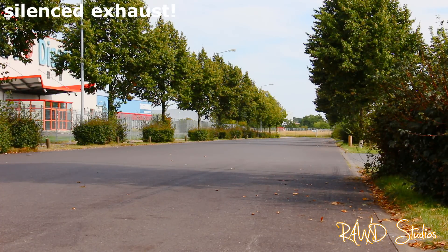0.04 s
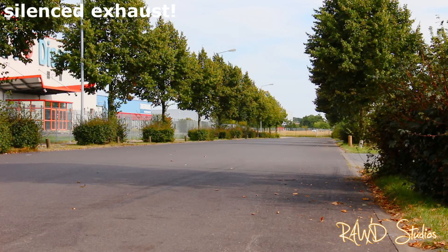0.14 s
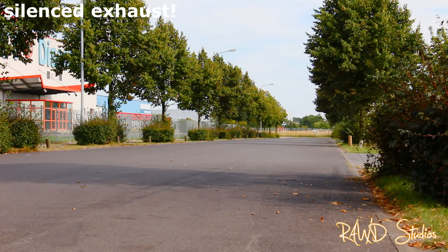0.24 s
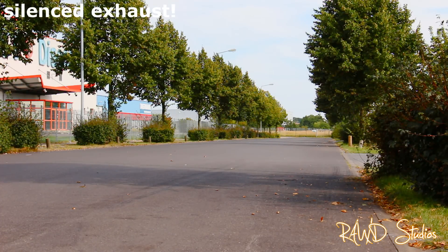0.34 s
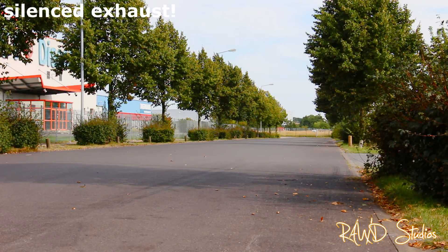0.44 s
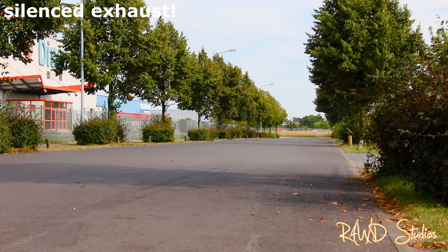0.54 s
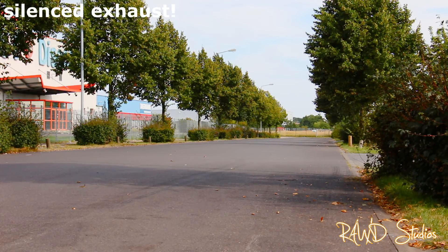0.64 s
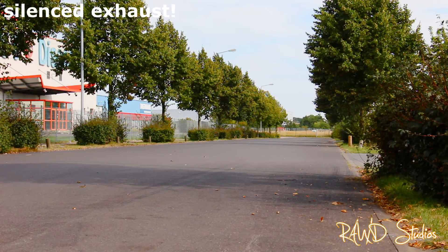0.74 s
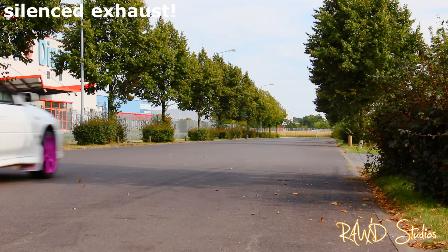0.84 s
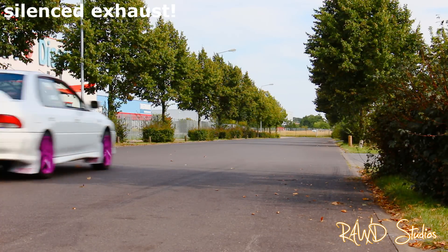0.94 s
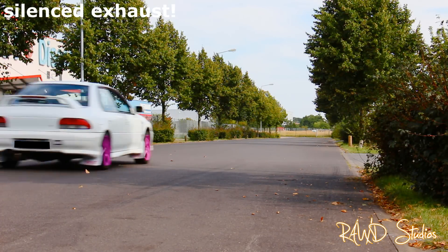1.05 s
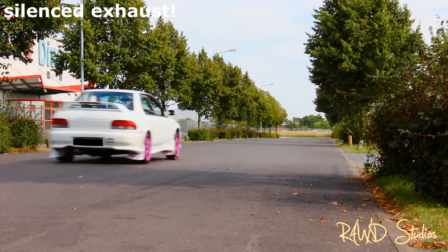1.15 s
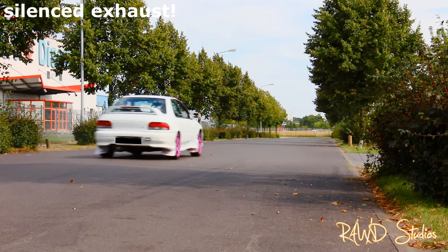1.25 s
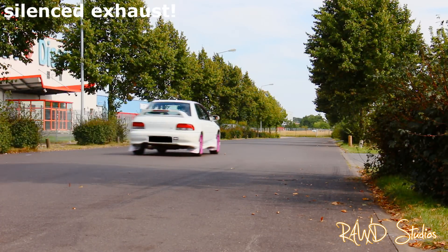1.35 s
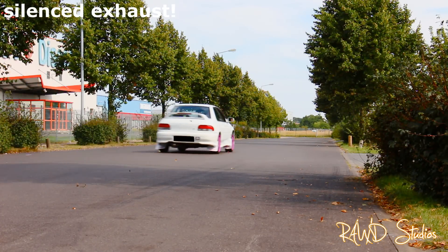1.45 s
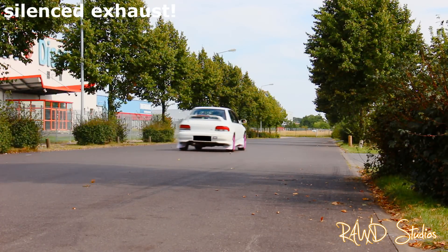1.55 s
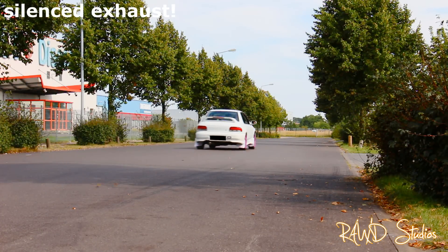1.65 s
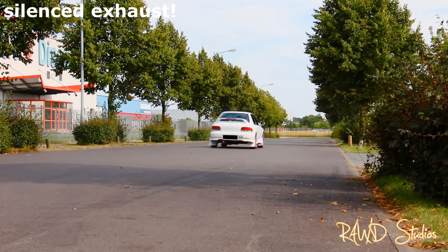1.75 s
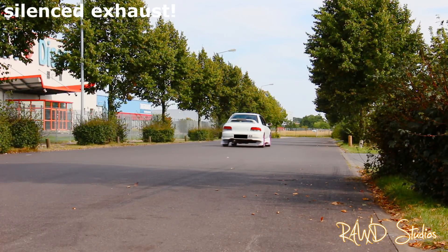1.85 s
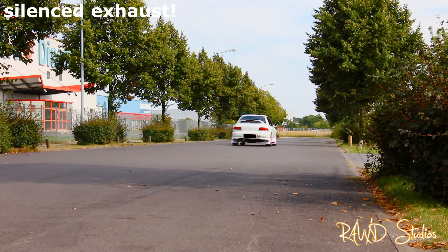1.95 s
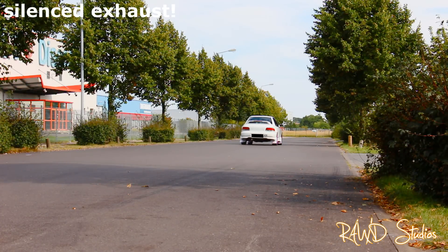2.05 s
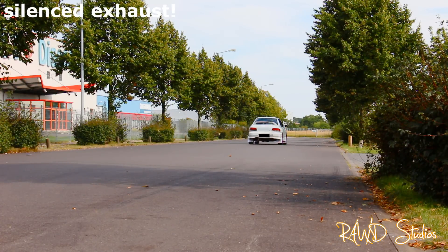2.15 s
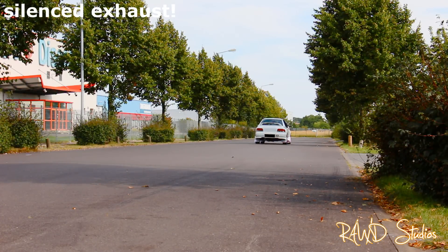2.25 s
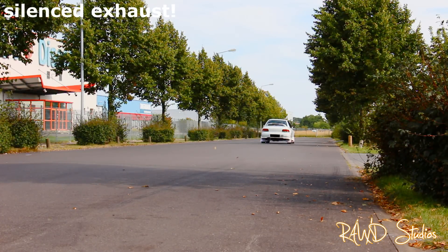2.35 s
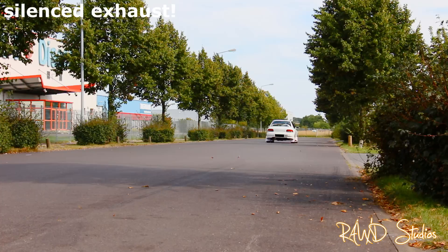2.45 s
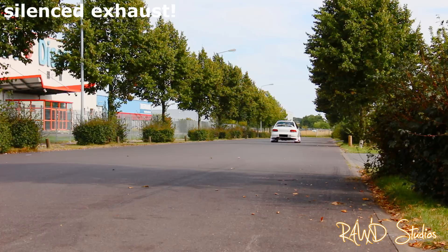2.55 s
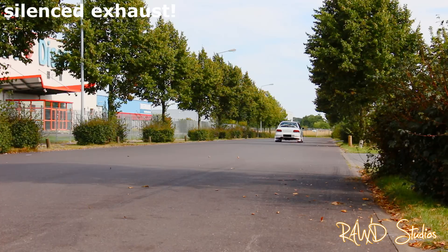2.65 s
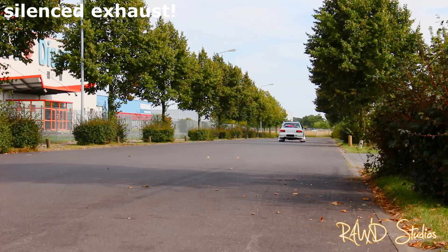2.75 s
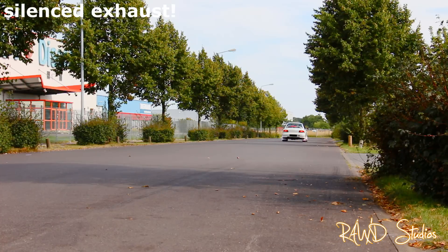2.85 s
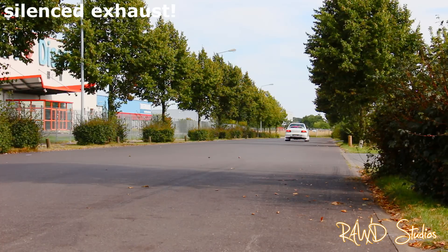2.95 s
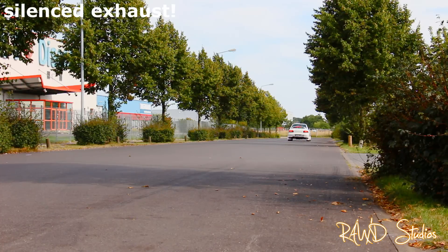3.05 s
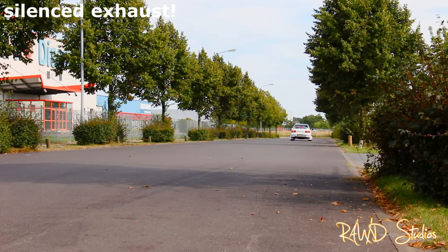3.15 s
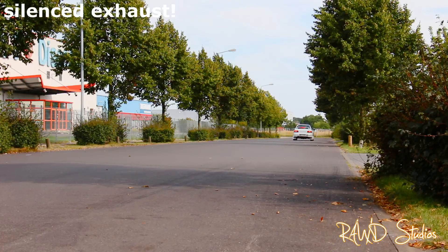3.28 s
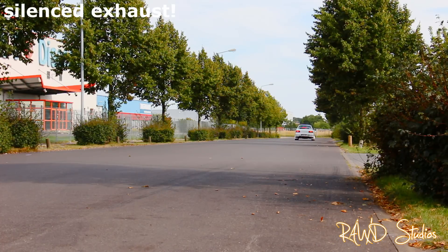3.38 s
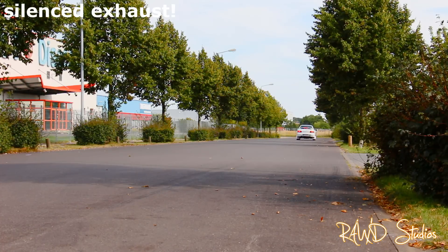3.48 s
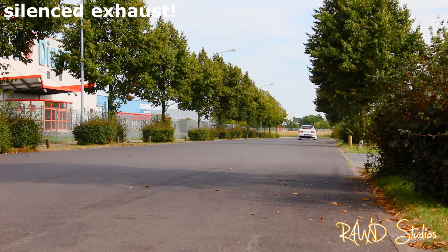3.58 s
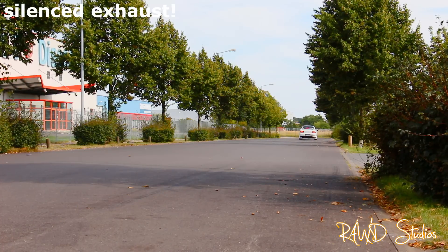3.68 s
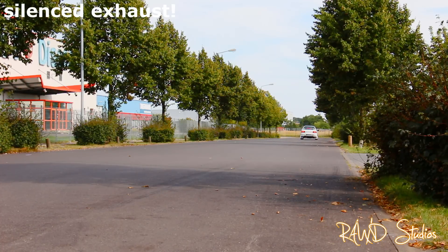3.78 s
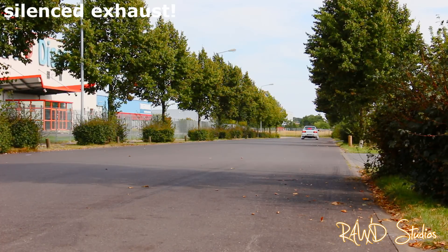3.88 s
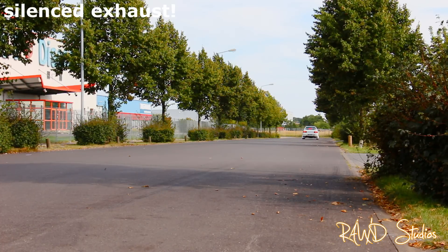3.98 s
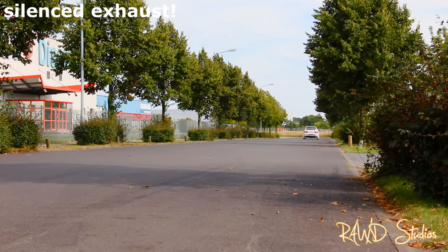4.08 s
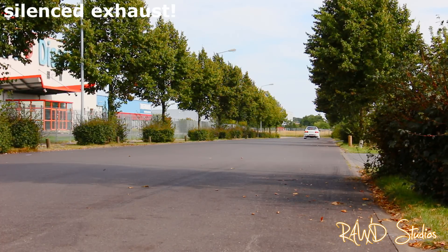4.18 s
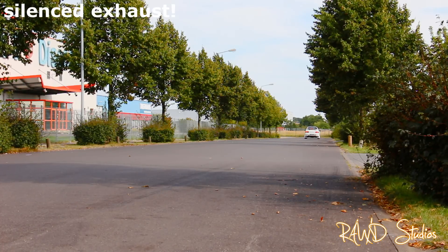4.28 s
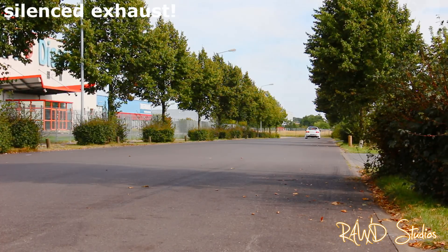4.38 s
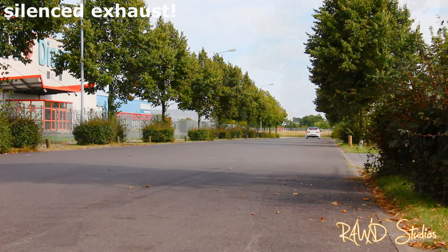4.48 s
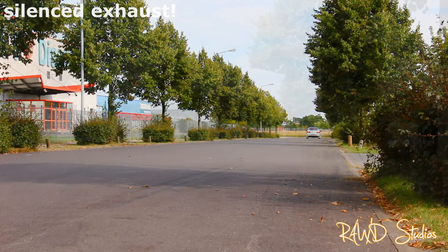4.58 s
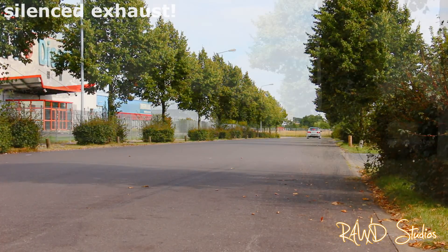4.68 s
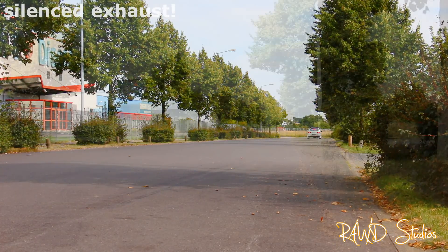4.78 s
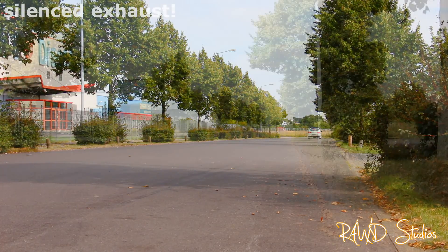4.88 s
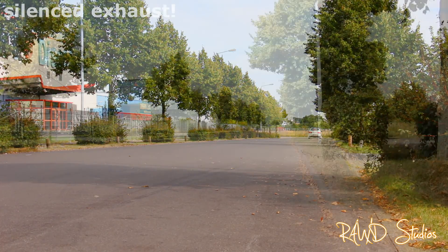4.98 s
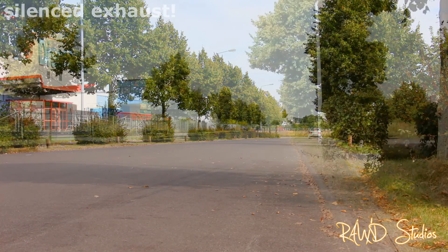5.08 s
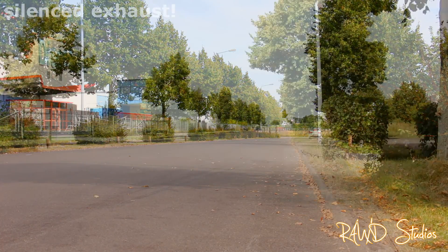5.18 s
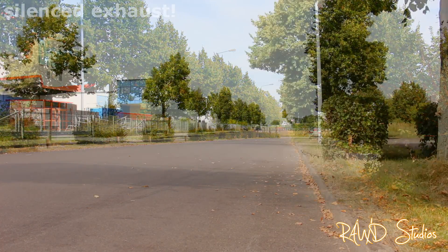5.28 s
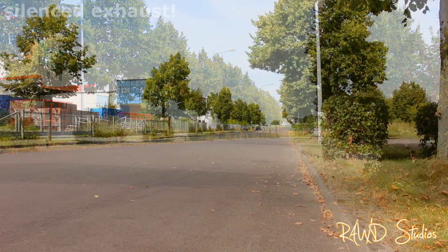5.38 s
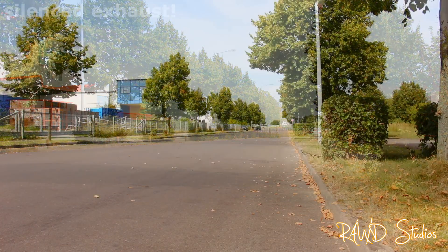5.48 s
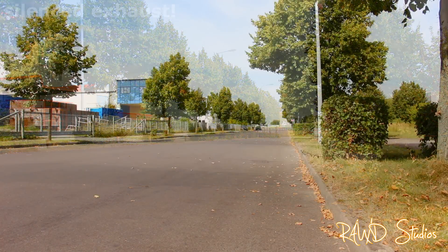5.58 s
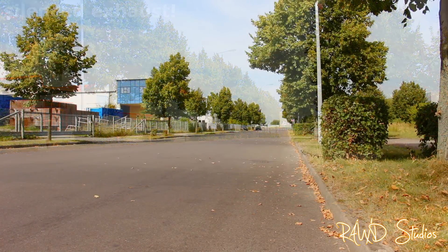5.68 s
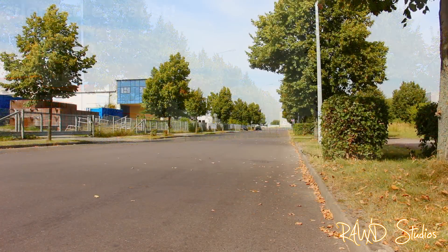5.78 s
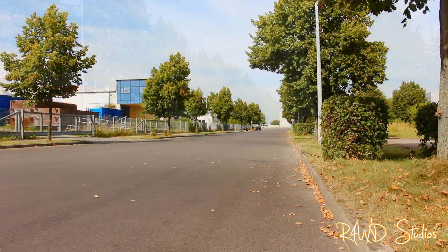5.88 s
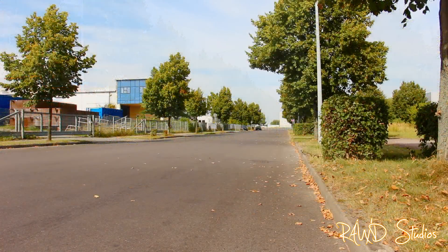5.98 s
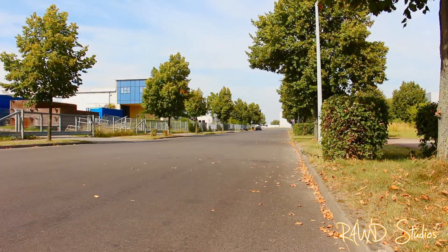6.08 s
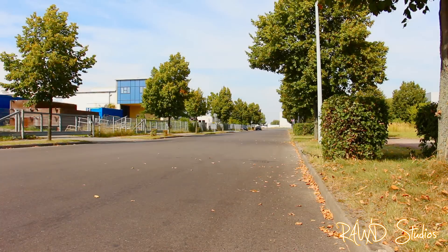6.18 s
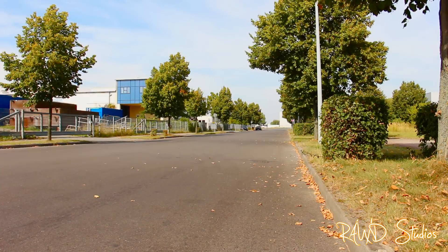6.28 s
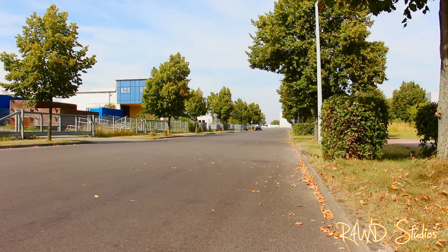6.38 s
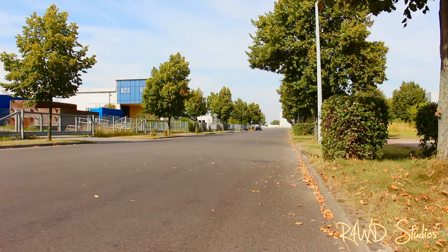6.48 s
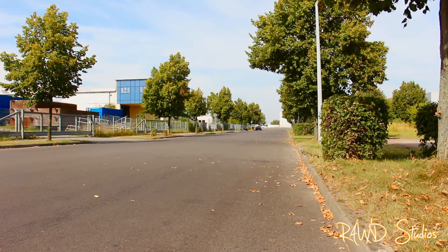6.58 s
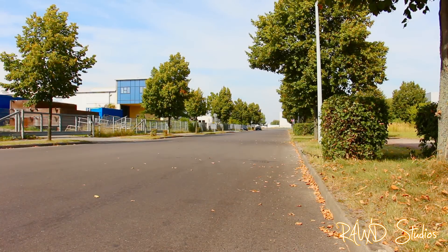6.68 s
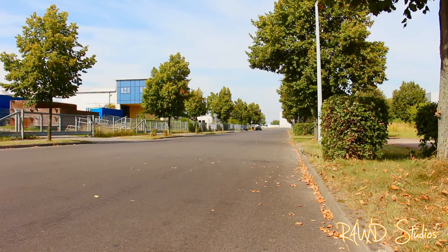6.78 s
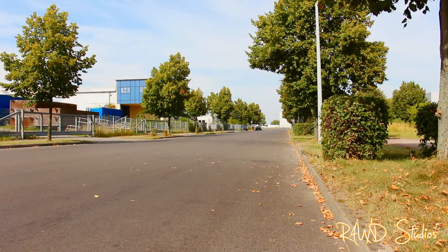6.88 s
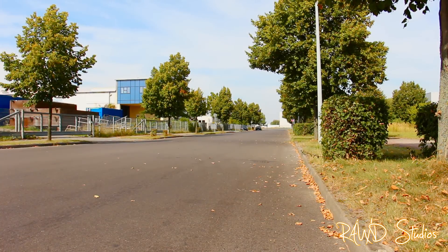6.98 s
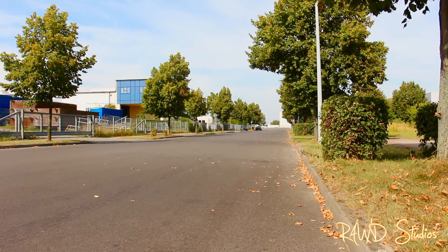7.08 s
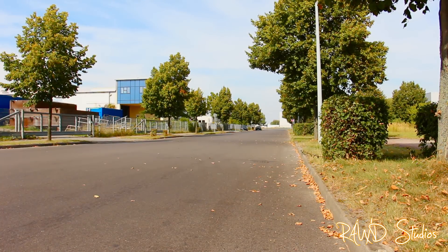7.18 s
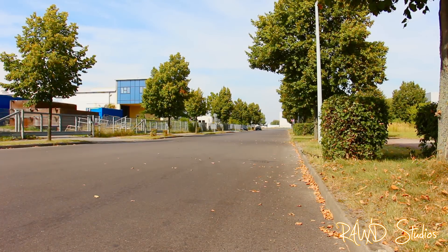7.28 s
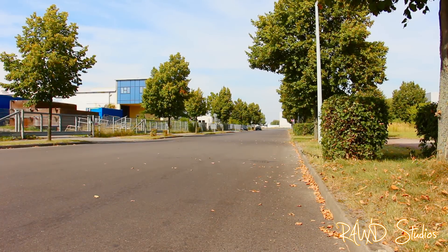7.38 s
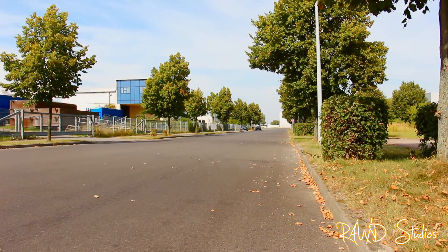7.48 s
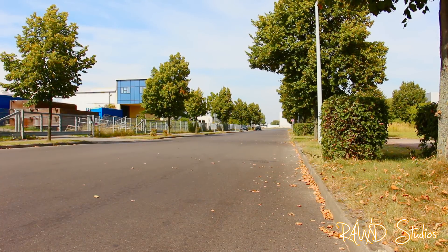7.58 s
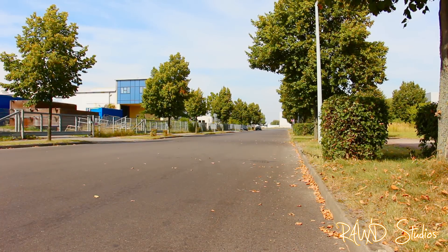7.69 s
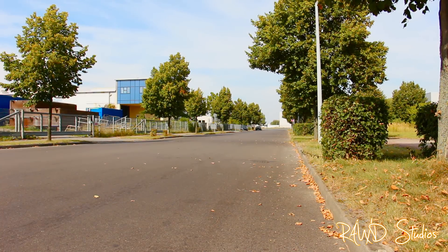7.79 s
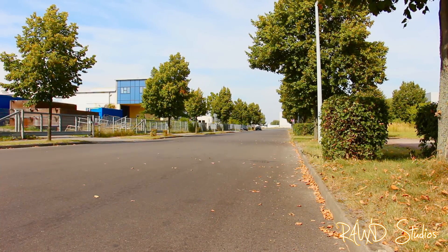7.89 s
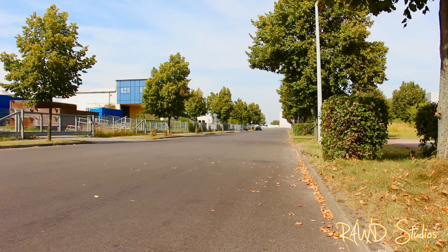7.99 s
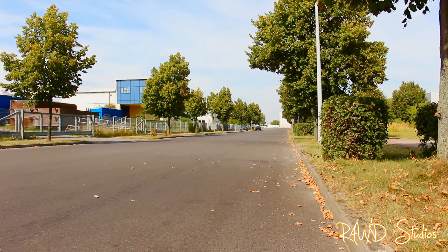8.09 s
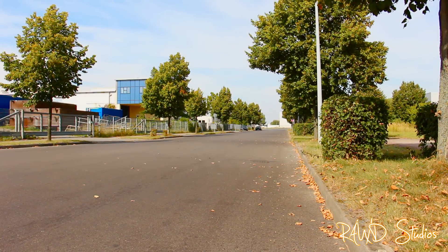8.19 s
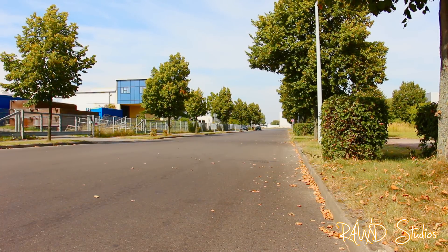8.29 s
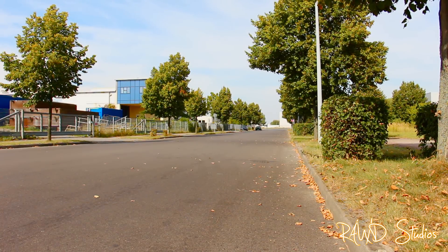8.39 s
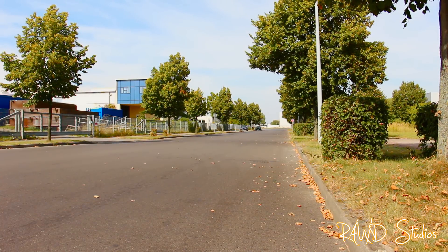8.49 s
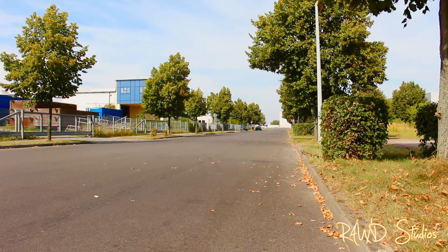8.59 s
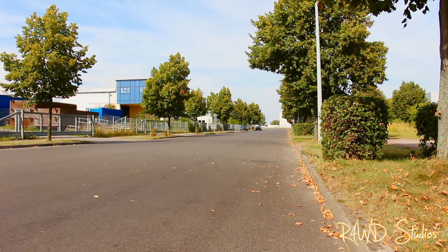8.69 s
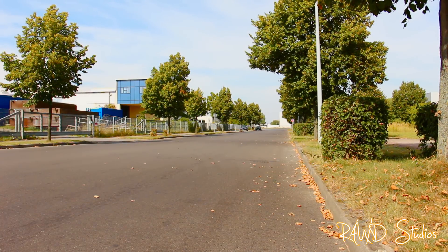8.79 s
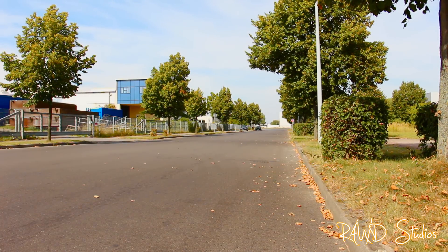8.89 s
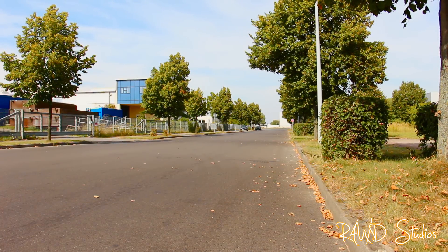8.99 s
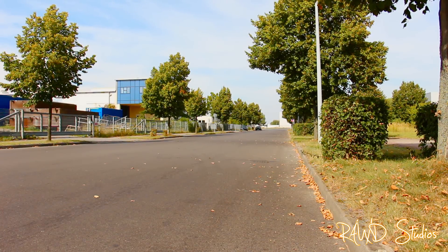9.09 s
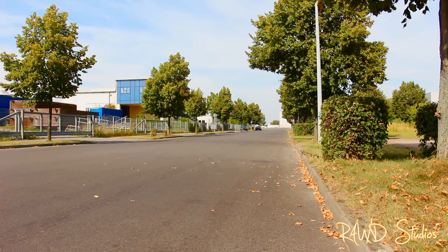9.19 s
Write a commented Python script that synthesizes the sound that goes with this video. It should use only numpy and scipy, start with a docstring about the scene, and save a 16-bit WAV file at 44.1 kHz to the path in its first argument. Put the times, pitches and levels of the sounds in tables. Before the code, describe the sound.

A loud full-throttle car pass, exhaust crackling as it coasts off, followed by a quieter approaching acceleration with one upshift.

```python
"""First you hear a car roar past at full throttle, so close that it overloads the microphone.
The driver lifts off, and the exhaust of its turbocharged flat-four engine crackles and burbles away.
A second, approaching pull fades in over it, with a thin turbo whistle, a gear change, a few puffs
and a lower, Doppler-shifted reflection. Tyres roar, intake air rushes and dry leaves tick.
The engine note is a stack of tones called orders: order k swings k times in each four-stroke cycle."""
import sys
import numpy as np
from scipy import signal
from scipy.fft import rfft, irfft, next_fast_len
from scipy.io import wavfile

SR = 44100
rng = np.random.default_rng(int(sys.argv[2]) if len(sys.argv) > 2 else 0)


def store_pcm(level_fs):
    """Save levels as 16-bit WAV."""
    pcm = np.round(np.clip(level_fs, -1, 1) * 32767).astype(np.int16)
    wavfile.write(sys.argv[1], SR, np.atleast_2d(pcm).T)


N = 407484
T = np.arange(N) / SR
LIFT_S, SHIFT_S, SHIFT_END_S = 1.902, 7.62, 8.3  # the driver lifts off; the gear change starts, ends


def from_db(db):
    """Turn decibels into a gain."""
    return 10 ** (np.asarray(db) / 20)


def rms_one(x):
    """Scale a signal to an average power of 1."""
    return x / np.sqrt(np.mean(x ** 2) + 1e-20)


def in_time(rows, t=T):
    """Read a table's columns at times t, gliding between rows."""
    seconds, *columns = np.transpose(rows)
    return [np.interp(t, seconds, column) for column in columns]


def at_hz(colour, hz):
    """Gain of a colour (a table of Hz and dB) at a frequency; almost nothing beyond its ends."""
    freqs, db = np.transpose(colour)
    return from_db(np.interp(np.log(hz + 1e-6), np.log(freqs), db, left=-90, right=-90))


def after(start, fade):
    """Fade in around start and stay on."""
    return np.clip((T - start) / fade + .5, 0, 1)


def window(start, end, fade_in, fade_out):
    """Fade in around start and out around end."""
    return after(start, fade_in) * np.clip((end - T) / fade_out + .5, 0, 1)


def bell(x, centre, width):
    """A smooth bump of height 1."""
    return np.exp(-.5 * ((x - centre) / width) ** 2)


def drift(rate_hz, t=T):
    """A smooth random wobble, about 1 in size."""
    pole = np.exp(-80 * np.pi * rate_hz / SR)
    slow = signal.lfilter([1], [1, -2 * pole, pole * pole], rng.standard_normal(N // 40 + 2002))[2000:]
    return np.interp(t * SR / 40, np.arange(len(slow)), rms_one(slow))


def noise(colour):
    """Steady noise of the given colour, with power 1."""
    size = next_fast_len(N)
    spectrum = rfft(rng.standard_normal(size)) * at_hz(colour, np.fft.rfftfreq(size, 1 / SR))
    return rms_one(irfft(spectrum, size)[:N])


def swells(rows, colour):
    """Noise that rises to each peak and falls away just as fast."""
    return noise(colour) * sum(from_db(db) * np.exp(-np.abs(T - s) / fade) for s, db, fade in rows)


def crank(cycle_hz, t):
    """How far the engine's cycle has turned, in radians; its speed is a little unsteady."""
    return 2 * np.pi * np.cumsum(cycle_hz * (1 + .003 * drift(25.7, t))) / SR


# The four cylinders fire unevenly. Each row: place in the cycle from 0 to 1, strength.
FIRINGS = [(0, 0.87), (0.228, 0.396), (.5, 0.54), (0.787, 0.46)]

def order_tone(k, angle, t, flutter_db, scatter):
    """One order: the firings set its timing; street echoes scatter that (in radians) and add flutter."""
    place, strength = np.transpose(FIRINGS)
    lead = np.angle(np.sum(strength * np.exp(-2j * np.pi * k * place))) + scatter * drift(0.98, t)
    return np.sqrt(2) * np.cos(k * angle + lead) * from_db(flutter_db * drift(7.9, t))


def exhaust_behind(speed, gate, orders, pipe, *, boom_db, third_db, bark_db, count,
                   flutter_db, scatter, gas_db, throb, tilt_db=0, flare_db=0):
    """The exhaust from behind: a low boom, a bark coloured by the pipe, and throbbing gas noise."""
    on = gate > 0
    t, cycle_hz = T[on], speed[on]
    boom_db, third_db, bark_db, tilt_db, flare_db = (
        np.broadcast_to(db, N)[on] for db in (boom_db, third_db, bark_db, tilt_db, flare_db))
    angle = crank(cycle_hz, t)
    third = from_db(third_db)  # order 3 compared with order 4, the firing rate
    firing = 1 / np.hypot(1, third)
    boom, bark, bark_power = 0, 0, 1e-12
    for k in range(1, count + 1):
        tone = order_tone(k, angle, t, flutter_db, scatter)
        weight = from_db(np.interp(k, *np.transpose(orders)))
        if k < 7:
            boom += tone * firing * {3: third, 4: 1}.get(k, weight)
        else:
            flare = flare_db * bell(k * cycle_hz, centre=780, width=55)
            gain = weight * at_hz(pipe, k * cycle_hz) * from_db(tilt_db * np.log2(k) + flare)
            bark += gain * tone
            bark_power += gain ** 2
    gas = from_db(gas_db) * noise(pipe)[on] * rms_one(np.exp(throb * np.cos(angle)))
    out = np.zeros(N)
    out[on] = from_db(boom_db) * boom + from_db(bark_db) * (bark / np.sqrt(bark_power) + gas)
    return out * gate


# Colours of tyre roar, intake rush and hiss. Each row: frequency in Hz, level in dB.
NEAR_TYRES = [(60,-22),(130,-15),(250,-0.5),(600,4.5),(1100,1),(1500,-4),(2000,-12),(2600,-14),(4000,-42)]
FAR_TYRES = [(330,-23.5),(480,-4),(680,-10.5),(850,-4.5),(1250,0),(1550,-4),(1800,-10),(2100,-24.5),(3000,-27)]
RUSH = [(1200,-10),(2000,-0.5),(2500,-4),(3100,-3),(4000,-6),(5000,-12),(6300,-16.5),(8000,-23.5)]
NEAR_HISS = [(4500,-7),(6500,-4.5),(8000,-3.5),(11000,-5.5),(14000,-8),(16000,-13)]
FAR_HISS = [(4800,0),(6500,-1),(8500,-3),(10500,-9.5),(13000,-22),(16000,-26)]

def air(gains, colours, flicker_db):
    """Layers of noise, shaken together by swirling air."""
    layers = sum(gain * noise(colour) for gain, colour in zip(gains, colours))
    return layers * from_db(flicker_db * drift(28))


# Passing tyres, rush and hiss. Each row: peak time in seconds, level in dB,
# then the seconds before and after the peak at which the power is half.
PASSING_AIR = [(0.89,-14.5,0.28,0.49),(1,-23,0.41,0.37),(0.8,-25.5,0.73,0.19)]

def passing_air():
    """Tyre and air noise grow as the car nears and fade as it leaves; the hiss surges close by."""
    roar, rush, hiss = (from_db(db) / np.hypot(1, (T - s) / np.where(T < s, before, later))
                        for s, db, before, later in PASSING_AIR)
    surge = from_db(4.1 * bell(T, centre=0.63, width=0.09))
    return air([roar, rush, hiss * surge], (NEAR_TYRES, RUSH, NEAR_HISS), flicker_db=0.5)


# Engine speed as heard; the Doppler drop flattens its climb near one second.
# Each row: time in seconds, cycles per second.
PASS_SPEED = [(0,43.3),(.3,46.4),(.5,48.7),(.7,49.4),(.85,49.3),(1.05,50.2),(1.45,53.4),(1.82,56.2),(1.92,56.6)]
# Exhaust loudness. Each row: time in seconds, boom in dB, bark in dB, bark brightness in dB per octave.
PASS_LEVELS = [(0,-15.5,-23,0),(.3,-14.5,-17.5,-15),(.5,-19.5,-16,-1),(.58,-12,-14.5,0),(.63,-14.5,-12.5,0),(.69,-15.5,-3.5,2),(1.05,-8.5,-0.5,4),(1.16,-14.5,-1,1.5),(1.55,-19,-5,1),(1.88,-19.5,-8,-7.5)]
# Unequal exhaust pipes favour some orders. Each row: order, level in dB.
PASS_ORDERS = [(1,-30),(2,-25),(5,-6),(6,-20),(7,-15),(8,1.5),(9,2),(10,-13),(11,4),(12,1.5),(13,1),(14,-8),(15,-1),(16,-8),(17,0),(18,-4),(19,0),(20,-6),(21,0),(22,-6),(23,-1),(24,-3),(26,-1),(30,-6),(34,-3),(37,-2),(42,-5)]
# The pipe's colour at full throttle. Each row: frequency in Hz, level in dB.
PASS_PIPE = [(130,-24),(220,-17),(300,-10),(365,-5),(400,-6),(450,-2),(550,0),(620,0),(700,-3.5),(760,-6),(860,-9),(1050,-20),(1400,-23),(1950,-22),(2400,-36)]

def close_pass():
    """Full throttle beside the microphone, which overloads and squares off the wave."""
    gate = 1 - after(LIFT_S, fade=0.021)
    speed, = in_time(PASS_SPEED)
    boom_db, bark_db, tilt_db = in_time(PASS_LEVELS)
    flare_db = 11.5 * bell(T, centre=1.08, width=0.073)  # the tailpipe swings into view
    exhaust = exhaust_behind(
        speed, gate, PASS_ORDERS, PASS_PIPE, boom_db=boom_db, third_db=-9, bark_db=bark_db, count=42,
        flutter_db=1, scatter=.4, gas_db=-23, throb=0.28, tilt_db=tilt_db, flare_db=flare_db)
    ceiling = from_db(-6.5)
    drive = (exhaust + passing_air() * gate) / ceiling
    squared = ceiling * drive / (1 + drive ** 6) ** (1 / 6)
    # the input passes little of the deep tones that overload makes
    low_cut = signal.butter(2, 65, "high", fs=SR, output="sos")
    return signal.sosfiltfilt(low_cut, squared, padtype="even")


# The echo's colour. Each row: frequency in Hz, level in dB.
ECHO_COLOUR = [(90,-20),(170,1),(260,3.5),(350,2),(450,-12),(900,-16)]

def street_echo(sound, level_db=-32.5, decay_db_per_s=60):
    """Add the dull echo of buildings and trees."""
    tail = noise(ECHO_COLOUR)[:SR] * from_db(-decay_db_per_s * T[:SR])
    return sound + from_db(level_db) * signal.fftconvolve(sound, tail / np.linalg.norm(tail))[:N]


# The rumble's loudness. Each row: time in seconds, level in dB.
RUMBLE_LEVELS = [(0,-30),(2.3,-41),(3.3,-36.5),(4.3,-29),(4.7,-17),(5.5,-27),(6.6,-31.5),(7.4,-26.5),(8.3,-26.5),(9.24,-43)]
# Its colour. Each row: frequency in Hz, level in dB.
RUMBLE_COLOUR = [(12,-11),(25,-14.5),(45,-6.5),(80,-7.5),(165,-4.5),(205,-24.5),(270,-42),(450,-23.5),(700,-27.5)]

def rumble():
    """A low noise that swells and sinks under everything."""
    return from_db(in_time(RUMBLE_LEVELS)[0]) * noise(RUMBLE_COLOUR)


# The tailpipe's bark while coasting. Each row: time in seconds, level in dB.
COAST_BARK = [(1.91,-25),(1.98,-13),(2.09,-14),(2.17,-15.5),(2.195,-23),(2.26,-19),(2.31,-17.5),(2.44,-13.5),(2.79,-17.5),(3.61,-16.5),(3.87,-20.5),(4.67,-27.5),(4.9,-39)]
# The burble's mix of tones. Each row: order, level in dB.
COAST_ORDERS = [(1,-21),(2,-19),(5,-10),(6,-20),(7,9),(8,-5),(9,-5),(10,-6),(11,1),(12,2),(13,-5),(14,6),(15,2.5),(16,-4),(17,-7),(18,0),(19,3),(20,-7),(21,0),(22,-8),(23,2),(24,-6),(25,-9),(26,-2),(27,-11),(28,-5),(30,-11),(45,-10)]
# Where the silencer and the pipe ring. Each row: frequency in Hz, level in dB.
SILENCER = [(30,-32.5),(60,-26),(80,-24.5),(100,-16.5),(125,-30.5),(145,-35.5),(175,-30.5),(215,-47)]
COAST_PIPE = [(130,-19),(220,-29),(300,-23.5),(380,-19),(450,1),(520,-0.5),(620,3),(690,-13),(850,-13.5),(1100,-49),(1600,-31)]

def coasting():
    """Friction and drag slow the engine; its burble booms wherever it meets a silencer resonance."""
    start_hz, friction_hz_per_s, drag_per_s, end_s = 53.8, 4.27, .326, 4.9
    gate = window(LIFT_S, end_s, fade_in=.02, fade_out=0.22)
    elapsed = np.minimum(T, end_s) - LIFT_S
    friction_hz = friction_hz_per_s / drag_per_s
    speed = (start_hz + friction_hz) * np.exp(-drag_per_s * elapsed) - friction_hz
    third = from_db(-5) * at_hz(SILENCER, 3 * speed)
    firing = at_hz(SILENCER, 4 * speed)
    return exhaust_behind(
        speed, gate, COAST_ORDERS, COAST_PIPE, boom_db=20 * np.log10(np.hypot(third, firing)),
        third_db=20 * np.log10(third / firing), bark_db=in_time(COAST_BARK)[0], count=48,
        flutter_db=1.5, scatter=1.3, gas_db=-17, throb=0.41)


# Tyre roar while coasting. Each row: time in seconds, level in dB.
ROAR_LEVELS = [(1.949,-35),(2.4,-31.5),(2.701,-35.5),(3.15,-30.5),(3.55,-24.5),(4.9,-20),(5.5,-20.5),(6,-26.5),(6.4,-44)]
# Rush, then hiss. Each row: level in dB when the roar is at -24 dB, share of the roar's
# rise and fall that it follows, intake air in dB as the driver lifts off.
ROLLING_AIR = [(-43,0.19,-40.5),(-63.5,0.41,-49.5)]

def rolling():
    """Tyres roar as the car coasts; rush and hiss follow them once the intake air has died down."""
    roar_db, = in_time(ROAR_LEVELS)
    since_lift = np.maximum(T - LIFT_S, 0)
    rush, hiss = (np.hypot(from_db(db + share * (roar_db + 24)), from_db(intake_db - 20 * since_lift))
                  for db, share, intake_db in ROLLING_AIR)
    top_hiss = from_db(-50 - 81 * since_lift)  # the highest hiss dies fastest
    gate = window(LIFT_S, ROAR_LEVELS[-1][0], fade_in=0.029, fade_out=0.24)
    gains = [from_db(roar_db), rush, hiss, top_hiss]
    return air(gains, (FAR_TYRES, RUSH, FAR_HISS, NEAR_HISS), flicker_db=1) * gate


# Exhaust crackles. Each row: start in seconds, level in dB.
CRACKLES = [(1.989,-29),(2.009,-35),(2.029,-28),(2.049,-29),(2.069,-32),(2.128,-31),(2.148,-28.5),(2.168,-28),(2.235,-28)]
# Their colour. Each row: frequency in Hz, level in dB.
CRACKLE_COLOUR = [(1500,-16),(2700,4),(3600,3),(4600,-4),(6500,-18),(10000,-32)]

def crackles(decay_s=0.0019):
    """The exhaust snaps sharply just after the driver lifts off."""
    snaps = sum(from_db(db) * (T >= s) * np.exp(-np.abs(T - s) / decay_s) for s, db in CRACKLES)
    return noise(CRACKLE_COLOUR) * snaps


# The silencer's mutter. Each row: peak time in seconds, level in dB, fade in seconds.
MUTTER = [(2.7,-34.5,0.53)]
# Its colour. Each row: frequency in Hz, level in dB.
MUTTER_COLOUR = [(110,-12),(180,-3.5),(290,-0.5),(380,-1.5),(450,-14)]

def mutter():
    """Gas mutters low in the silencer as the coasting sets in."""
    return swells(MUTTER, MUTTER_COLOUR)


# Leaf sounds. Each row: peak time in seconds, level in dB, fade in seconds.
LEAF_TICKS = [(3.661,-41,0.0028),(4.338,-48,0.003),(4.851,-42,0.025),(4.877,-32,0.0032),(5.16,-42,.002),(5.1,-38.5,1),(5.556,-25,0.0058)]
# Their colour. Each row: frequency in Hz, level in dB.
LEAF_COLOUR = [(1500,5.5),(3000,9.5),(6000,-8),(8500,-4.5),(12000,-11),(16000,-14)]

def leaves():
    """Dry leaves give short ticks and one long rustle."""
    return swells(LEAF_TICKS, LEAF_COLOUR)


# A chuff of air. Each row: peak time in seconds, level in dB, fade in seconds.
CHUFF = [(4.42,-41,0.15)]
# Its colour. Each row: frequency in Hz, level in dB.
CHUFF_COLOUR = [(1900,-21.5),(2700,-6),(3500,6),(4400,-4),(6000,-22),(9000,-30)]

def chuff():
    """A soft breath of air as the second pull fades in."""
    return swells(CHUFF, CHUFF_COLOUR)


# Exhaust loudness in the second pull. Each row: time in seconds, boom in dB, overtones in dB.
PULL_LEVELS = [(4.46,-19,-28),(5.3,-14,-19.5),(6.1,-14.5,-15.5),(6.95,-13,-16),(7.05,-15.5,-15.5),(7.5,-13,-15),(7.7,-11.5,-1.5),(7.9,-5,-7),(8.2,-7,-15),(8.25,-14,-20),(8.38,-14.5,-17.5),(8.6,-16,-15),(9.24,-12,-14.5)]
# Its mix of tones. Each row: order, level in dB.
PULL_ORDERS = [(1,-13),(2,-14),(3,-5),(4,0.7),(5,-5.5),(6,-21),(7,-11),(8,-7),(9,-13),(10,-23),(11,-19),(12,-9),(13,-13),(14,-20),(15,-18),(16,-13),(17,-12),(18,-20),(19,-13),(20,-13),(22,-19),(24,-13),(28,-18)]
# The exhaust's colour from ahead. Each row: frequency in Hz, level in dB.
PULL_PIPE = [(20,-22),(60,-12),(80,-8),(100,-4),(130,1),(160,0),(200,0),(225,-7),(255,-10),(285,-11),(320,-9.5),(365,-15),(425,-10),(480,-15),(545,-11),(620,-16),(720,-21),(830,-13.5),(950,-22),(1200,-21),(1700,-29),(2100,-42)]

def exhaust_ahead(speed, gain, count):
    """The exhaust from ahead: clean tones climb through the resonances of silencer and pipe."""
    on = gain > 0
    t, cycle_hz = T[on], speed[on]
    angle = crank(cycle_hz, t)
    boom_db, overtone_db = in_time(PULL_LEVELS, t)
    shut_db = -15.5 * window(SHIFT_S, SHIFT_END_S, fade_in=0.21, fade_out=0.26)[on]
    note = np.zeros(N)
    for k in range(1, count + 1):
        if k < 6:
            level_db, flutter_db = boom_db, 1.2
        else:  # overtones flutter more, and slowly come and go
            level_db, flutter_db = overtone_db + 3.5 * drift(1.5, t), 3
        if k != 3:  # with the throttle shut, all orders but the third sink
            level_db = level_db + shut_db
        weight = from_db(np.interp(k, *np.transpose(PULL_ORDERS)) + level_db)
        tone = order_tone(k, angle, t, flutter_db, scatter=.4 * (1 + k / 8))
        note[on] += weight * at_hz(PULL_PIPE, k * cycle_hz) * tone
    return note * gain


# Exhaust gas, tyres, rush, far hiss and near hiss. Each row: base level in dB, then the dB added
# per doubling of engine speed, per second of approach, and when the turbo's boost is gone.
PULL_AIR = [(-28.5,10.5,2.5,-4),(-38,3,2.5,-2),(-38.5,13,2.5,-1),(-46,11.5,5,-6.5),(-57,-2,11.5,-14)]
# The exhaust gas's colour. Each row: frequency in Hz, level in dB.
GAS_COLOUR = [(120,4.5),(220,3),(310,-2),(420,-5),(600,-5),(810,-5),(1000,-14.5),(1700,-41),(2400,-26)]

def approaching_air(speed, cruise_hz=45):
    """Gas, tyre and air noise follow the engine speed, grow as the car nears and dip with the boost."""
    boost_lost = np.interp(T, [SHIFT_S, 8.2, 8.55], [0, 1, 0])
    surge_db = 3.1 * bell(T, centre=7.47, width=0.25)  # at the top of first gear
    doublings = np.log2(speed / cruise_hz)
    levels_db = [db + surge_db + per_doubling * doublings + per_s * (T - SHIFT_S) + dip_db * boost_lost
                 for db, per_doubling, per_s, dip_db in PULL_AIR]
    return air(from_db(levels_db), (GAS_COLOUR, FAR_TYRES, RUSH, FAR_HISS, NEAR_HISS), flicker_db=.5)


# Engine speed in first gear, the change and second gear. Each row: time in seconds, cycles per second.
PULL_SPEED = [(4.45,17.5),(4.75,20),(5.25,25.8),(5.75,32.5),(6.25,40.4),(6.5,45.2),(6.75,50.8),(7,57.6),(7.5,70.3),(7.55,70.5),(7.63,64),(7.75,61.1),(8,54.2),(8.15,49.7),(8.25,43.5),(8.4,43.2),(8.75,46.6),(9.24,51)]

def second_pull():
    """The engine winds up through a gear change; a Doppler-lowered reflection beats against it."""
    speed, = in_time(PULL_SPEED)
    gate = after(4.46, fade=.08)
    # the reflection's share of the power and its drop in pitch are both smaller in second gear
    share = .47 * (1 - after(SHIFT_S, fade=0.24)) + .15 * after(SHIFT_END_S, fade=0.24)
    drop = np.where(T < SHIFT_END_S - .3, .00212 * speed, .036)
    direct = exhaust_ahead(speed, gate * np.sqrt(1 - share), count=28)
    reflected = exhaust_ahead(speed * (1 - drop), gate * np.sqrt(share), count=13)
    return direct + reflected + approaching_air(speed) * gate


# Exhaust puffs. Each row: peak time in seconds, level in dB, pitch in Hz, width in seconds.
PUFFS = [(5.572,-20,42,0.045),(7.555,-13,118.4,0.04),(7.593,-18,55,0.038),(7.761,-17,100,0.038),(8.202,-37,39.3,.03),(8.205,-13,139,0.03)]

def puffs():
    """Short, low bursts of gas, mostly around the gear change."""
    out = np.zeros(N)
    for s, db, hz, width in PUFFS:
        tone = np.sqrt(2) * np.sin(2 * np.pi * hz * (T - s) + drift(32))
        out += from_db(db) * bell(T, s, width) * tone
    return out


# The turbo's whistle. Each row: time in seconds, pitch in Hz, level in dB.
TURBO = [(5.9,2974,-58.5),(6.25,2950,-47),(6.55,2796,-57),(6.8,2900,-54),(7.2,3035,-46),(7.8,3045,-41),(8.25,2963,-55),(8.55,2980,-46),(9.24,3068,-68)]

def turbo(waver=.02):
    """The spinning turbo gives a thin, wavering whistle that comes and goes."""
    hz, db = in_time(TURBO)
    angle = 2 * np.pi * np.cumsum(hz * (1 + waver * drift(58))) / SR
    return np.sqrt(2) * from_db(db + 2 * drift(25)) * np.sin(angle) * after(TURBO[0][0], fade=.2)


def scene():
    """A car roars past and coasts away; a second, approaching pull fades in over it."""
    car = street_echo(close_pass()) + coasting() + rolling() + second_pull() + turbo()
    return (car + rumble() + puffs() + crackles() + leaves() + chuff() + mutter())[None]


def record(dry, cutoff_hz=15700):
    """Round off the loudest peaks and cut the highest treble."""
    drive = dry / 0.81
    rounded = .7 * drive / (1 + drive ** 6) ** (1 / 6)
    return signal.sosfilt(signal.ellip(12, .1, 80, cutoff_hz, fs=SR, output="sos"), rounded)


dry = scene()
out = record(dry)
store_pcm(out)
```